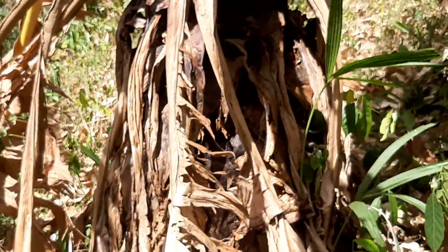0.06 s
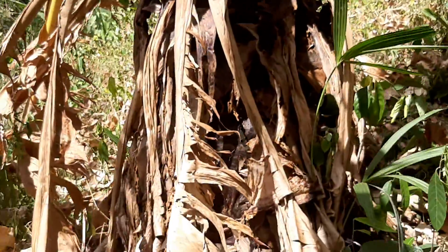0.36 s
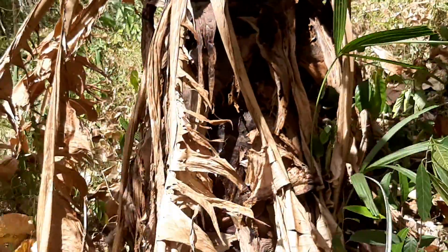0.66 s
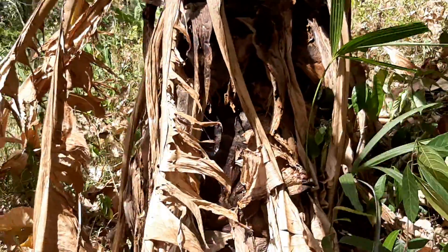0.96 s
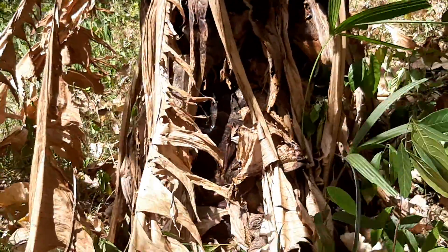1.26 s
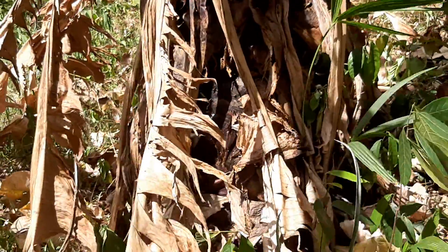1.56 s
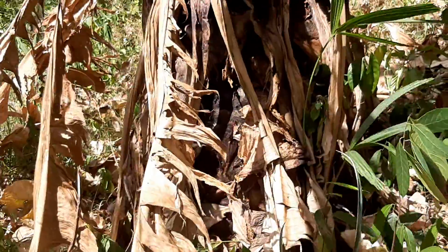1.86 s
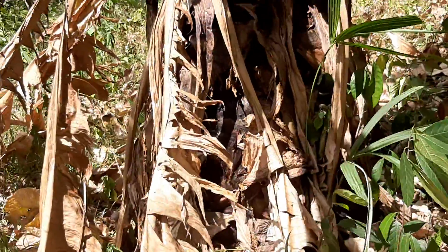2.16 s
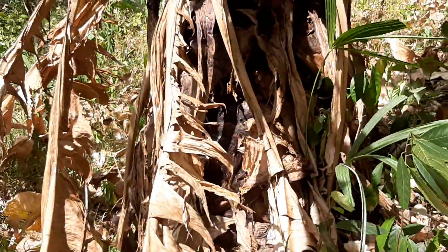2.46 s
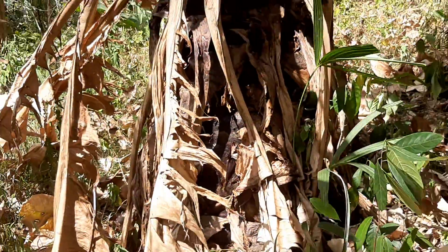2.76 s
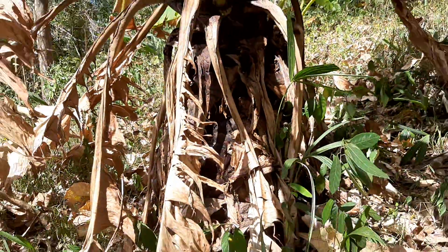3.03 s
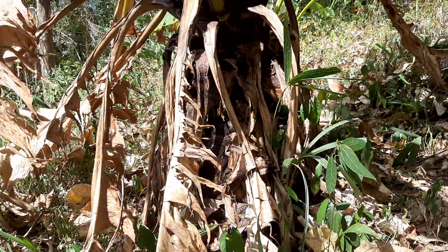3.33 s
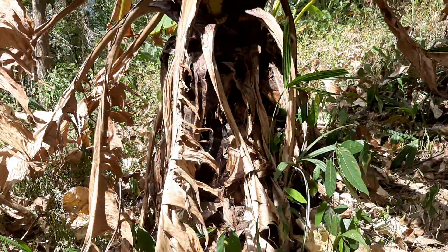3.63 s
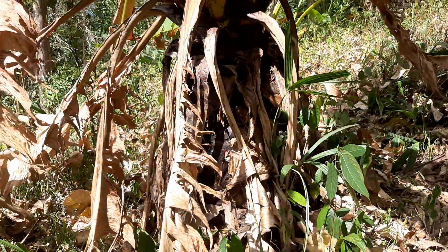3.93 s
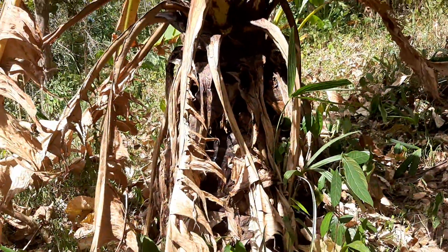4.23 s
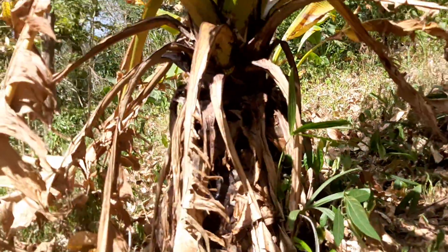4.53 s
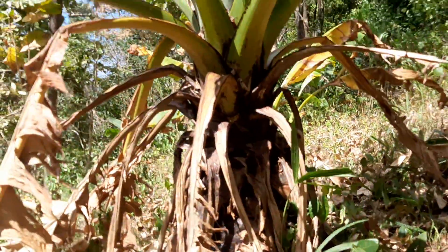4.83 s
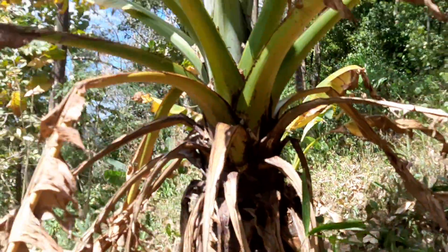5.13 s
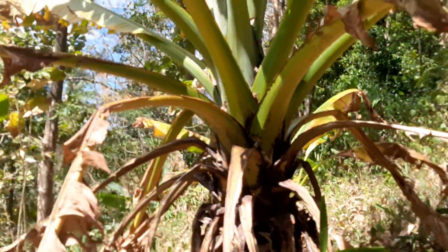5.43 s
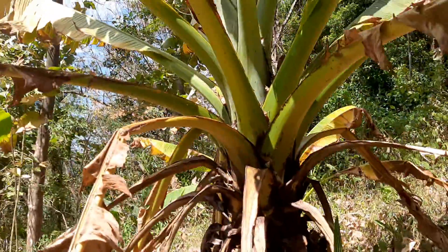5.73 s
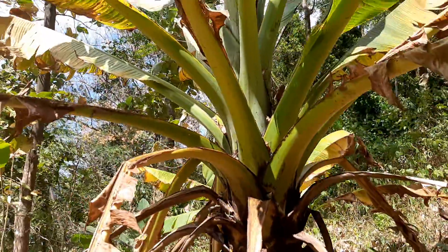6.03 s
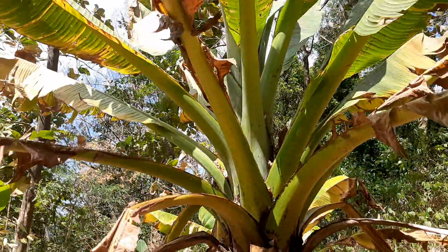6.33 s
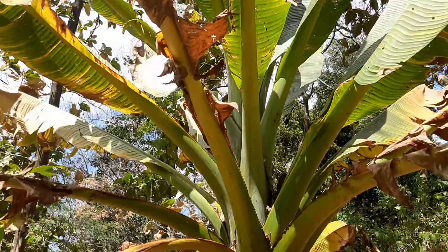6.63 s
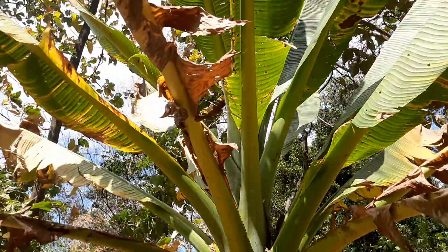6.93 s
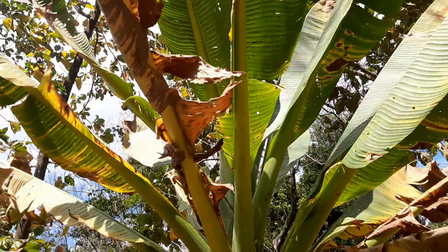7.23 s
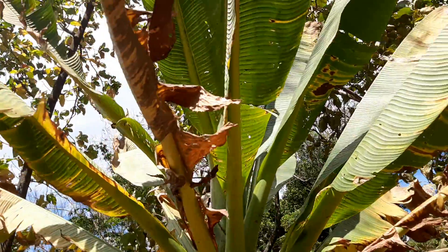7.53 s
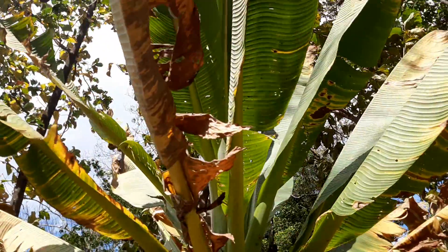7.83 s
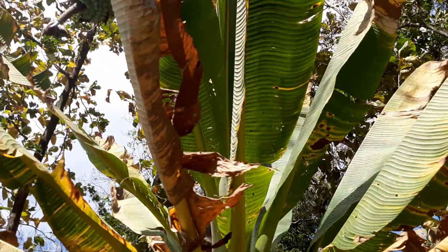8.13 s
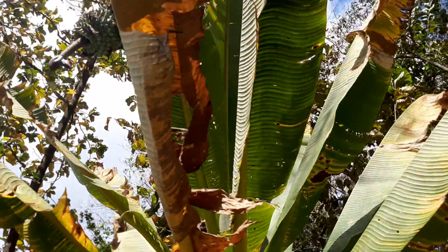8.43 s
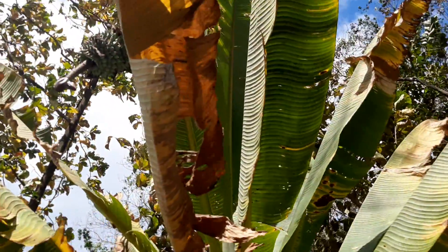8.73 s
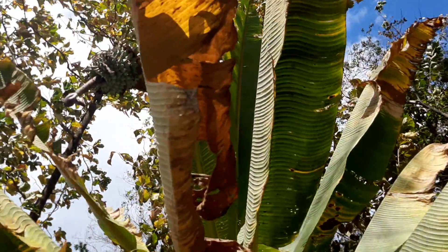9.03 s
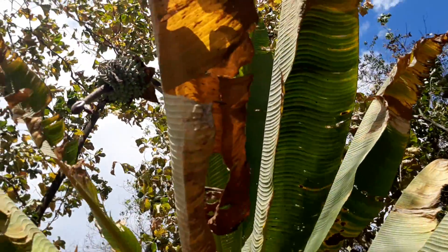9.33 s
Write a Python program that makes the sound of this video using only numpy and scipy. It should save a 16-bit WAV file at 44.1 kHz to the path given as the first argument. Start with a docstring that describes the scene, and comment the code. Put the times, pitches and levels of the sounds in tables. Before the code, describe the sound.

Wind moves through dry banana leaves outdoors, close to a hand-held microphone. From the start the leaves rustle brightly in quick surges, with sharp little snaps and the rasp of blades rubbing together. At about 1.5 seconds low gusts begin thumping the microphone, strongest just before 2 seconds. The rustle then sinks, and uneven rumbling puffs continue until about 4.3 seconds, with scattered small cracks. From about 4.5 seconds a second, fuller spell of papery rustling arrives, slightly to the right at first. It surges around 5 seconds and again from 6 to 7.4 seconds, with frequent crisp snaps and a short scrape near 6.4 seconds, while the buffeting is much lighter. After 7.5 seconds the wind drops, leaving a soft hush of surrounding trees, a brief rub and a few faint snaps until about 9.5 seconds.

```python
"""Wind surges through dry banana leaves and buffets the two ports of a hand-held microphone.
First the leaves rustle brightly from the left; single blades snap sharply or rub on each other.
From about 1.5 s the rustle sinks while puffs and eddies thump the ports.
At 4.3 s the microphone turns and a second spell of rustling follows, fuller and nearer the front.
Toward the end the wind drops, leaving the hush of the trees around and a few faint snaps."""
import sys
import numpy as np
from scipy import signal
from scipy.fft import rfft, irfft, next_fast_len
from scipy.io import wavfile
from scipy.ndimage import uniform_filter1d, map_coordinates

SR = 44100
rng = np.random.default_rng(int(sys.argv[2]) if len(sys.argv) > 2 else 0)


def file_out(sig):
    """Save sig as 16-bit WAV at sys.argv[1]."""
    # one column per channel
    cols = np.atleast_2d(sig).T
    # limit, then scale
    lim = np.clip(cols, -1, 1)
    pcm = np.round(lim * 32767).astype(np.int16)
    wavfile.write(sys.argv[1], SR, pcm)


N = 418068

# Surges that shake the leaves. Each row: start in seconds, length in seconds, level in dB,
# broad blades in dB over that level, fine shreds in dB over that level.
SURGES = [(0.0, 0.1, -42, -6, -17), (0.14, 0.043, -33.5, -7.5, -9), (0.225, 0.049, -27.5, -11.5, -8),
          (0.256, 0.031, -25, -11, -10), (0.356, 0.074, -33, -11, -13), (0.504, 0.091, -30, -11, -9.5),
          (0.796, 0.17, -30.5, -8, -14), (0.95, 0.75, -31, -10.5, -9), (1.376, 0.15, -33.5, -5, -13),
          (4.56, 0.1, -43, -1.5, 0.5), (4.718, 0.2, -42, -3, -4), (5.03, 0.47, -37.5, -2.5, -5.5),
          (5.062, 0.037, -36.5, 2, -7), (5.105, 0.064, -28, -1.5, -6.5), (5.38, 0.067, -36, -7, -6),
          (5.874, 0.026, -38.5, 0.5, -8), (5.952, 0.035, -38.5, -2.5, -9), (6.117, 0.6, -34.5, -1.5, -12),
          (6.268, 0.12, -31.5, -1.5, -6.5), (6.344, 0.058, -32, -13, -6), (6.448, 0.067, -30.5, -21, -7.5),
          (6.692, 0.099, -38, -2.5, -20), (6.807, 0.34, -34.5, -2.5, -11), (6.942, 0.05, -30.5, -5, -2),
          (7.06, 0.082, -34.5, -17, -3), (7.143, 0.21, -38, -5.5, -5), (7.356, 0.28, -45, -5, -6.5)]
# Stirring between surges. Each row: time in seconds, level in dB, broad blades in dB over that level.
STIRRING = [(0.0, -36.5, -8), (0.75, -40, -6.5), (1.8, -40.5, -4.5), (2.25, -52.5, -2.5), (2.7, -50, -4.5),
            (3.2, -52.5, -2.5), (4.0, -54, -4), (4.4, -50.5, -2.5), (5.5, -42.5, -2), (5.75, -49, -4.5),
            (6.1, -44, -5.5), (7.3, -51, -3), (7.7, -50, -2.5), (8.05, -52.5, -1), (8.5, -62, 0),
            (9.48, -54.5, -20)]
# Rustle spectra, first and second spell. Each row: frequency in Hz, relative density in dB.
BRIGHT_SPECTRUM = [(100, -31), (300, -7.5), (700, -2.5), (1100, -2.5), (1500, -1.5), (2100, -1.5),
                   (3000, -1), (5000, -1.5), (7500, -1), (8600, -15.5), (10500, -15), (13000, -11),
                   (15800, -16.5)]
FULL_SPECTRUM = [(100, -21.5), (300, -5), (550, -4), (1000, -1.5), (1750, -5), (2500, 0.5), (3900, 3.5),
                 (5500, 1), (7400, -10.5), (8600, -37), (10000, -19), (12500, -12), (15800, -20)]
# Shading of the left port, second spell. Each row: frequency in Hz, left minus right in dB.
PORT_SHADE = [(1400, -1), (2500, -2), (5000, -3), (7000, -10.5), (8500, -25.5), (10500, -0.5),
              (15000, -3.5)]
# Leaf balance as the microphone turns. Each row: time in seconds, left minus right in dB.
LEAF_PAN = [(0.0, -1.0), (0.55, 0.5), (2.01, -1), (4.3, -1.5), (4.72, -6), (6.78, 1), (7.08, -6.5),
            (9.48, -3)]
# Treble loss of softer or farther leaves. Each row: frequency in Hz, gain in dB.
TREBLE_LOSS = [(3000, 0), (4500, -2), (6000, -4.5), (7500, -8), (11000, 0.2)]
# Course of that loss. Each row: time in seconds, share from 0 to 1.
LOSS_SHARE = [(1.8, 0.66), (2.3, 0.35), (4.2, 0.32), (4.5, 0.056), (5.5, 0.72), (5.8, 1), (6.75, 1),
              (6.95, 0.012), (7.3, 0.59), (7.6, 0.83)]
# Snapping blades. Each row: start in seconds, crack level in dB over 10 ms, body and splinters each
# in dB over the crack, crumbling time in seconds, body pitch in Hz, crack pitch in Hz.
SNAPS = [(0.043, -29.5, 2, -4.5, 0.00035, 1550, 3400), (0.073, -34, 2, -7, 0.0048, 1380, 3830),
         (0.178, -34.5, 1.5, -8, 0.0012, 2240, 4950), (0.207, -23, -10, -5, 0.0005, 1290, 4690),
         (0.338, -25, -12, -11, 0.0016, 1720, 3750), (0.447, -27.5, -12, -18, 0.0012, 2210, 3730),
         (0.666, -22.5, -17, -19, 0.0012, 1400, 6440), (0.877, -25.5, -26, -12, 0.006, 1890, 3830),
         (0.957, -27, -16, -10, 0.003, 1940, 6160), (1.479, -27, -22, -7, 0.0014, 1510, 6330),
         (1.525, -27, -10, -15, 0.0031, 2070, 6290), (1.738, -29, -12, -1.5, 0.003, 1680, 4350),
         (1.756, -27, -19, -8, 0.0008, 2020, 6370), (1.916, -27.5, -12, -5, 0.0022, 1980, 6500),
         (2.119, -35.5, -3.5, -9, 0.0061, 2110, 3570), (2.484, -43, -2, -2, 0.0004, 2020, 6930),
         (2.63, -27, 0, -1.5, 0.0022, 815, 5270), (2.676, -40, 0, -11, 0.0064, 2110, 4910),
         (2.709, -40, -20, -8, 0.0007, 2020, 7060), (3.024, -44.5, -10, -5, 0.002, 1890, 6680),
         (3.096, -40, -2, -5, 0.0046, 1980, 5810), (3.213, -42, -11, 6, 0.0008, 1980, 4650),
         (3.566, -45, -7, -2, 0.0006, 2020, 5080), (3.657, -43.5, 1.5, -4, 0.0015, 1510, 3490),
         (4.053, -42.5, -6, -19, 0.0022, 2070, 3060), (4.2, -45, 1, 4.5, 0.0044, 2070, 5900),
         (4.361, -44.5, -11, -5, 0.0015, 2020, 5540), (4.499, -35.5, 2, -3, 0.0021, 2360, 4130),
         (4.527, -43, 3, -9, 0.001, 950, 5470), (4.54, -43.5, 0, -7, 0.002, 950, 5770),
         (4.603, -36, -4, -3, 0.0072, 860, 3880), (4.614, -30.5, 1, -5, 0.0012, 860, 3920),
         (4.765, -34, -5, -3, 0.0005, 2070, 3880), (4.782, -34, -7, -8, 0.001, 2020, 6760),
         (4.822, -33.5, -0.5, -6, 0.007, 2070, 3340), (4.863, -34, -13, -4, 0.0016, 2070, 3790),
         (4.894, -32, -4, -16, 0.0063, 1080, 3700), (4.997, -36, -2.5, -20, 0.0013, 990, 4740),
         (5.033, -35, -16, -12, 0.0005, 2240, 4350), (5.071, -28, -11, -19, 0.0017, 2370, 3770),
         (5.305, -25.5, -1, -2, 0.0016, 2410, 3970), (5.39, -22, -7.5, -13, 0.0007, 2110, 5300),
         (5.507, -28, 0.5, -11, 0.0005, 2070, 2820), (5.624, -34.5, -19, -12, 0.0026, 2330, 4180),
         (5.658, -36.5, -7, -7, 0.0035, 1510, 3100), (5.888, -35.5, -2, -11, 0.0044, 2150, 4080),
         (5.97, -37, -9, -9, 0.0053, 1460, 3270), (6.188, -30, -6.5, -12, 0.0028, 1510, 5040),
         (6.237, -30.5, -10, -16, 0.0019, 1510, 3100), (6.4, -21.5, -7, -11, 0.005, 2020, 3880),
         (6.44, -28.5, -6.5, -17, 0.002, 1460, 4050), (6.453, -24.5, -7.5, -17, 0.0022, 1380, 4030),
         (6.49, -26.5, -4.5, -20, 0.0017, 1460, 3750), (6.61, -31, -5, -18, 0.002, 1550, 3100),
         (6.683, -34, -9, -26, 0.002, 2020, 3450), (6.865, -28, -6, -13, 0.0011, 1980, 2820),
         (6.925, -31.5, -0.5, -5, 0.0011, 2073, 4180), (6.961, -31, -3, -12, 0.003, 2370, 3790),
         (6.978, -28, -0.5, -8, 0.0035, 2370, 2840), (6.993, -29, -1, -10, 0.0028, 2280, 4610),
         (7.013, -26.5, -1.5, -4, 0.0019, 1510, 3940), (7.036, -28, -17, -12, 0.0032, 2020, 5560),
         (7.063, -31, -12, -3.5, 0.0006, 2370, 4240), (7.228, -36.5, -7, -11, 0.001, 2110, 4350),
         (7.294, -25, -6.5, -9.5, 0.0015, 2110, 3760), (7.619, -47, 3.5, 1, 0.0021, 1510, 3230),
         (7.705, -42.5, -5.5, -5, 0.0028, 2370, 5000), (7.819, -45, 1, 0, 0.0038, 2330, 4180),
         (7.971, -40.5, -1, -5, 0.0029, 1150, 2840), (8.111, -48.5, -2, -20, 0.0021, 2300, 4100),
         (8.354, -42, -15, -13, 0.0027, 2020, 4130), (8.855, -48, -2.5, -15, 0.0034, 2410, 4130),
         (9.007, -48, -11, -15, 0.006, 1510, 3830), (9.287, -48, -2, -7, 0.0035, 2300, 4180)]
# Rubbing blades. Each row: start in seconds, length in seconds, level in dB, first pitch in Hz,
# last pitch in Hz, bandwidth in Hz.
RUBS = [(0.251, 0.18, -34.5, 2970, 3400, 1400), (0.255, 0.07, -35, 1650, 1550, 700),
        (0.898, 0.71, -34.5, 5490, 4580, 1890), (0.988, 0.68, -43, 3045, 2960, 600),
        (1.302, 0.5, -41, 6700, 6300, 1100), (3.088, 0.03, -41, 1736, 1630, 500),
        (6.309, 0.11, -26, 3600, 3690, 990), (6.445, 0.085, -24, 3930, 3930, 800),
        (6.332, 0.21, -35, 1328, 1434, 450), (6.577, 0.16, -37, 3280, 3110, 1000),
        (6.796, 0.63, -40.5, 2486, 2615, 600), (6.9, 0.12, -35, 2200, 2550, 700),
        (6.935, 0.21, -37, 5600, 5720, 1500), (8.209, 0.03, -39.5, 3130, 3960, 900),
        (8.239, .034, -36.5, 4000, 4700, 1300)]
# Steady flow over the ports. Each row: time in seconds, level in dB.
FLOW = [(0.0, -58), (0.65, -56), (1.0, -48), (1.35, -44.5), (1.7, -37.5), (2.25, -45), (2.8, -46),
        (3.2, -47), (3.85, -48), (4.3, -51), (5.0, -60), (5.45, -53), (5.95, -52), (6.2, -68), (6.6, -53),
        (7.8, -67), (9.48, -58)]
# Puffs on the ports. Each row: centre in seconds, length in seconds, peak in dB.
PUFFS = [(0.565, 0.06, -44), (0.796, 0.061, -38.5), (1.025, 0.18, -39.5), (1.172, 0.049, -37.5),
         (1.506, 0.054, -30.5), (1.596, 0.021, -27.5), (1.671, 0.024, -31), (1.705, 0.019, -33),
         (1.747, 0.02, -29.5), (1.844, 0.059, -32), (1.907, 0.025, -33.5), (1.967, 0.051, -33),
         (2.066, 0.023, -31.5), (2.13, .022, -34.5), (2.158, 0.035, -34), (2.303, 0.034, -34),
         (2.354, .04, -35), (2.391, 0.022, -34), (2.537, 0.02, -40), (2.64, 0.068, -37), (2.686, .022, -37),
         (2.753, 0.06, -33), (2.796, 0.016, -35), (2.861, 0.035, -37.5), (2.94, .02, -40),
         (3.055, 0.018, -36.5), (3.107, .035, -39.5), (3.41, 0.084, -36), (3.462, .03, -41),
         (3.53, 0.035, -45), (3.652, 0.039, -45), (3.695, 0.025, -40), (3.769, 0.053, -39),
         (3.868, 0.038, -38), (4.05, 0.02, -39), (4.096, 0.03, -39), (4.156, 0.04, -39.5),
         (4.43, .025, -43), (4.503, .035, -43), (4.938, 0.04, -48), (5.127, .05, -45), (5.277, 0.13, -40.5),
         (5.663, 0.087, -45), (5.805, 0.13, -50.5), (6.4, 0.15, -50), (6.66, 0.04, -45), (8.54, 0.071, -52),
         (9.008, 0.096, -48.5)]
# Buffeting spectrum. Each row: frequency in Hz, relative density in dB.
RUMBLE_SPECTRUM = [(15, -19), (30, -15), (65, 2), (120, 0), (180, -5.5), (300, -14.5), (500, -34.5),
                   (1000, -60), (3000, -80)]
# Single eddies. Each row: centre in seconds, peak in dB, pitch in Hz, left minus right in dB.
EDDIES = [(1.6, -29, 120, 0), (1.675, -32, 200, 1), (1.752, -28, 460, 7), (1.82, -17, 157, -7),
          (1.827, -15.5, 403, 12), (1.948, -18, 110, -1), (1.96, -25, 332, 0), (1.986, -22.5, 208, -5),
          (2.16, -30, 100, -3), (2.31, -30, 258, -4), (2.38, -28, 140, -3), (2.736, -29, 94, 9),
          (2.781, -33, 280, 5), (2.877, -29.5, 67.6, 5), (3.402, -26.5, 121, 0), (3.428, -34, 330, 2),
          (3.544, -27.5, 70, 4), (4.165, -30.5, 89, -2), (3.837, -29, 120, -1), (4.115, -32, 95, -3),
          (8.06, -38, 430, 0)]
# Spectrum of the far trees. Each row: frequency in Hz, relative density in dB.
TREE_SPECTRUM = [(40, -2.5), (120, 0), (350, -3), (650, -4.5), (1300, -10.5), (2300, -7.5), (4600, -10.5),
                 (6200, -19.5), (7400, -21), (8600, -16), (15800, -19)]
# Likeness of their hush at the two ports. Each row: frequency in Hz, correlation from -1 to 1.
TREE_CORRELATION = [(80, 1.0), (400, 0.89), (750, 0.073), (1400, -0.59), (2600, 0.38), (6000, -0.019)]
# Left-port notch, widening as the microphone tilts up. Each row: time in seconds, depth in dB,
# width in Hz.
NOTCH = [(4.2, -2, 700), (4.4, 12, 700), (5.15, 4, 600), (5.75, 17, 900), (6.3, 3, 600), (6.7, 12, 600),
         (7.1, 4, 600), (7.7, 17, 800), (8.1, 23, 1200), (8.6, 33, 1700), (9.1, 32, 1690), (9.48, 15, 900)]
# Housing resonances. Each row: centre in Hz, width in Hz, lift in dB.
HOUSING_MODES = [(1507, 60, 5.5), (2020, 51, 5.5), (3930, 28, 0)]

SURGE_ATTACK_S, SURGE_T60_S = 0.024, 0.23
FLAP_DB, STIR_SHREDS_DB = 1.34, -6.5
RING_Q, BODY_RING_DB, CRACK_RING_DB = 5.1, 6, 7
FLUTTER_DB, FLUTTER_REF_DB, FLUTTER_DB_PER_DB = -13.5, -34.5, 0.66
TURN_S, NOTCH_HZ, TOP_HZ = 4.3, 8760, 15950


def rustle():
    """Leaf motion sets the level; broad blades add a papery body, fine shreds a fizz."""
    motion, blades, shreds = leaf_motion()
    bright = crackle(BRIGHT_SPECTRUM, lag_ms=0.22, spread_ms=0.055, spike_db=4.5,
                     burst_db=2.0, burst_t60_s=0.037, count=160000)
    bright = unit(bright * sides(curves(LEAF_PAN)[0]))
    full = crackle(FULL_SPECTRUM, lag_ms=0.085, spread_ms=0.036, spike_db=3.5,
                   burst_db=4.5, burst_t60_s=0.042, count=130000)
    full = unit(filtered(full, lambda hz: sides(along(PORT_SHADE, hz))))
    leaves = np.where(np.arange(N) / SR < TURN_S, bright, full)
    dull = curves(LOSS_SHARE)[0]
    leaves = (1 - dull) * leaves + dull * coloured(leaves, TREBLE_LOSS)
    body = blades * unit(band(leaves, 60, 2320))
    fizz = shreds * unit(band(leaves, 9600, 18200))
    return body + motion * unit(band(leaves, 2350, 9000)) + fizz


def leaf_motion():
    """Gains of leaves, blades and shreds: surges rise, hold and settle; the leaves flap unevenly."""
    stir_db, blades_db = curves(STIRRING)
    power = amp([stir_db, stir_db + blades_db, stir_db + STIR_SHREDS_DB]) ** 2
    for start_s, length_s, db, blade_db, shred_db in SURGES:
        t = np.arange(int((length_s + 1) * SR)) / SR
        envelope = np.minimum(t / SURGE_ATTACK_S, 1) * decay(SURGE_T60_S, np.maximum(t - length_s, 0))
        add(power, start_s, (amp([[db], [db + blade_db], [db + shred_db]]) * envelope) ** 2)
    return np.sqrt(power) * amp(FLAP_DB * wobble(14))


def crackle(spectrum, lag_ms, spread_ms, spike_db, burst_db, burst_t60_s, count, bursts_per_s=260):
    """Tiny fractures, each from its own direction, in bursts that start at once and run out."""
    at = rng.integers(0, N, count)
    sizes = rng.choice([-1, 1], count) * amp(spike_db * np.minimum(rng.standard_normal(count), 2))
    ticks = at_ports(at, sizes, lag_ms + spread_ms * rng.standard_normal(count), N)
    onsets = (rng.random(N) < bursts_per_s / SR) * amp(burst_db * np.minimum(rng.standard_normal(N), 2))
    tail = decay(burst_t60_s, np.arange(2048) / SR)
    bursts = np.abs(signal.fftconvolve(onsets ** 2, tail ** 2)[:N])
    ticks = patchy(ticks * np.sqrt(1.2 + bursts / bursts.mean()), depth_db=2.5, size=256, frames=3)
    # each moving leaf favours its own pitches for a while
    return coloured(patchy(ticks, depth_db=2, size=1024, frames=14), spectrum)


def snaps(count=24):
    """A blade cracks, crumbles and rings at two pitches; splinters tick, litter scatters the sound."""
    out, t = np.zeros((2, N)), np.arange(4096) / SR

    def part(x, lo_hz, hi_hz):
        """One band, with the energy of 10 ms at rms 1."""
        return unit(band(x, lo_hz, hi_hz)) * np.sqrt(SR / 100 / len(t))

    for start_s, db, body_db, splinter_db, crumble_s, body_hz, crack_hz in SNAPS:
        turned = start_s > TURN_S
        delay_s = np.r_[0, np.minimum(rng.exponential(crumble_s, count), 0.05)]
        sizes = np.r_[1, (0.1 + 50 * crumble_s) * rng.standard_normal(count)]
        lag_ms = (0.08 if turned else 0.19) + 0.03 * rng.standard_normal(count + 1)
        cracks = at_ports(((delay_s + 0.001) * SR).astype(int), sizes, lag_ms, len(t))
        blade = (t == 0) + 0.18 * decay(0.0036, t) * rng.standard_normal(len(t))
        direct = signal.fftconvolve(cracks, blade[None], axes=1)[:, :len(t)]
        scatter = (0.06 * decay(0.024, t) + 0.037 * decay(0.12, t)) * rng.standard_normal((2, len(t)))
        spectrum = FULL_SPECTRUM if turned else BRIGHT_SPECTRUM
        snap = patchy(direct + scatter, depth_db=1.5, size=128, frames=8)
        snap = filtered(snap, lambda hz: amp(0.85 * along(spectrum, hz))
                        * resonance(hz, body_hz, body_hz / RING_Q, BODY_RING_DB)
                        * resonance(hz, crack_hz, crack_hz / RING_Q, CRACK_RING_DB))
        splinters = amp(splinter_db) * part(cracks + 0.88 * scatter, 10800 if turned else 9300, 15300)
        body = amp(body_db) * part(snap, 267, 2770)
        pan_db = np.interp(start_s, *np.transpose(LEAF_PAN))
        add(out, start_s, amp(db) * (sides(pan_db) * (part(snap, 2550, 8800) + splinters) + body))
    return out


def rubs(slips_per_s=2000):
    """One edge catches and slips over another; each slip rings the blade, whose pitch shifts as it bends."""
    out = np.zeros((2, N))
    for start_s, length_s, db, first_hz, last_hz, width_hz in RUBS:
        n = int(length_s * SR)
        progress = np.linspace(0, 1, n)
        slips = (rng.random(n) < slips_per_s / SR) * rng.standard_normal(n)
        slips = slips * np.exp(2j * np.pi * rng.random(n))
        ring = signal.sosfilt(signal.butter(2, width_hz / 2, fs=SR, output="sos"), slips)
        pitch_hz = first_hz + progress * (last_hz - first_hz)
        rasp = (ring * np.exp(2j * np.pi * np.cumsum(pitch_hz) / SR)).real
        rasp = unit(rasp) * np.sqrt(np.abs(np.sin(np.pi * progress)))
        lag_ms, pan_db = (0.09, -3) if start_s > TURN_S else (0.21, 0)
        right = np.roll(rasp, round(lag_ms * SR / 1000))
        add(out, start_s, amp(db) * sides(pan_db) * np.array([rasp, right]))
    return out


def buffeting():
    """Turbulence thumps each port on its own; stronger flow reaches higher in pitch."""
    level_db = wind_level_db()
    rumble = unit(coloured(rng.standard_normal((2, N)), RUMBLE_SPECTRUM))
    thumps = amp(3.6 * np.array([wobble(32), wobble(32)]))
    thumps /= np.sqrt(uniform_filter1d(thumps ** 2, size=SR // 12, axis=1))  # keeps each gust's power
    flutter = unit(band(rng.standard_normal((2, N)), 160, 480) * thumps ** 2)
    flutter *= amp(FLUTTER_DB + FLUTTER_DB_PER_DB * (level_db - FLUTTER_REF_DB))
    return amp(level_db) * sides(pan_db=-3.5) * (unit(rumble * thumps) + flutter)


def wind_level_db():
    """Each puff swells and dies evenly on top of the steady flow."""
    power, t = amp(curves(FLOW)) ** 2, np.arange(-SR // 4, SR // 4) / SR
    for centre_s, length_s, db in PUFFS:
        add(power, centre_s + t[0], amp(db) ** 2 * np.exp(-(2 * t[None] / length_s) ** 2))
    return 10 * np.log10(power[0])


def eddies():
    """An eddy swings the pressure at each port once or twice."""
    out, t = np.zeros((2, N)), np.arange(-2048, 2048) / SR
    for centre_s, db, hz, pan_db in EDDIES:
        swing = np.sin(2 * np.pi * (hz * t + rng.random() + 0.12 * rng.standard_normal((2, 1))))
        add(out, centre_s + t[0], amp(db) * sides(pan_db) * swing * np.exp(-(hz * t / 0.59) ** 2))
    return out


def trees():
    """Hush from all around: patchy and alike at both ports in the bass, smooth and unrelated on top."""
    def mid_side(hz):
        angle = np.arccos(along(TREE_CORRELATION, hz)) / 2
        return amp(along(TREE_SPECTRUM, hz)) * [np.cos(angle), np.sin(angle)]

    white = rng.standard_normal((2, N))
    low = band(patchy(white, depth_db=3.0, size=512, frames=10), 5, 3100)
    mid, side = filtered(low + 1.1 * band(white, 3670, 21000), mid_side)
    level_db = -51 + 0.6 * wobble(2)
    return amp(level_db) * unit(np.array([mid + side, mid - side]))


def left_notch(x):
    """The left port loses a band of treble, with a steep lower edge and a gentle upper one."""
    hz, t, bins = signal.stft(x[0], SR, nperseg=512)
    time_s, depth_db, width_hz = np.transpose(NOTCH)
    offset = (hz[:, None] - NOTCH_HZ) / np.interp(t, time_s, width_hz)
    dip = np.where(offset < 0, np.exp(-offset ** 2), 1 / (1 + offset ** 2))
    bins *= amp(-np.interp(t, time_s, depth_db) * dip)
    return np.array([signal.istft(bins, SR, nperseg=512)[1][:N], x[1]])


def amp(db):
    """Decibels to gain."""
    return 10 ** (np.asarray(db) / 20)


def unit(x):
    """Scale to rms 1."""
    return x / np.sqrt(np.mean(x ** 2) + 1e-20)


def decay(t60_s, t):
    """Gain falling 60 dB in t60_s."""
    return amp(-60 * t / t60_s)


def along(points, hz):
    """(Hz, value) points read on a log axis."""
    knots_hz, values = np.transpose(points)
    return np.interp(np.log(hz + 1), np.log(knots_hz + 1), values)


def curves(rows):
    """One value per sample for each column after the time."""
    time_s, *columns = np.transpose(rows)
    return [np.interp(np.arange(N) / SR, time_s, column) for column in columns]


def wobble(knots_per_s):
    """Smooth random curve."""
    knots = rng.standard_normal(int(N * knots_per_s / SR) + 4)
    return map_coordinates(knots, [np.arange(N) * knots_per_s / SR])


def filtered(x, response):
    """Apply a frequency response."""
    n = x.shape[-1]
    padded = next_fast_len(n + 4096)
    return irfft(rfft(x, padded) * response(np.fft.rfftfreq(padded, 1 / SR)), padded)[..., :n]


def coloured(x, spectrum):
    """Filter by (Hz, dB) points."""
    return filtered(x, lambda hz: amp(along(spectrum, hz)))


def band(x, lo_hz, hi_hz):
    """Band-pass with soft edges."""
    return filtered(x, lambda hz: 1 / (1 + (hz / hi_hz) ** 10) - 1 / (1 + (hz / lo_hz) ** 10))


def resonance(hz, centre_hz, width_hz, lift_db):
    """Response of one resonant peak."""
    return 1 + (amp(lift_db) - 1) * 1j * hz * width_hz / (centre_hz ** 2 - hz ** 2 + 1j * hz * width_hz)


def patchy(x, depth_db, size, frames):
    """Random gain patches in time and frequency."""
    bins = signal.stft(x, nperseg=size)[2]
    field = uniform_filter1d(rng.standard_normal(bins.shape[1:]), size=4, axis=0)
    field = uniform_filter1d(field, frames, axis=1)
    return signal.istft(bins * amp(depth_db * unit(field)), nperseg=size)[1][:, :x.shape[-1]]


def sides(pan_db):
    """Left and right gains for a level difference."""
    return amp(np.array([[0.5], [-0.5]]) * pan_db)


def at_ports(at, sizes, lag_ms, length):
    """Impulses at sample positions; each reaches the right port lag_ms later."""
    right = np.clip(at + np.round(lag_ms * SR / 1000).astype(int), 0, length - 1)
    return np.array([np.bincount(at, sizes, length), np.bincount(right, sizes, length)])


def add(track, start_s, sound):
    """Mix a sound in."""
    start = max(round(start_s * SR), 0)
    track[:, start:start + sound.shape[1]] += sound[:, :N - start]


def scene():
    """Leaves, wind on the ports, far trees."""
    return rustle() + rubs() + snaps() + buffeting() + eddies() + trees()


def record(dry):
    """Left-port notch, faint housing ring, band limit."""
    housing = lambda hz: np.prod([resonance(hz, *mode) for mode in HOUSING_MODES], axis=0)
    return filtered(left_notch(dry), lambda hz: housing(hz) * (hz < TOP_HZ))


dry = scene()
out = record(dry)
file_out(out)
```